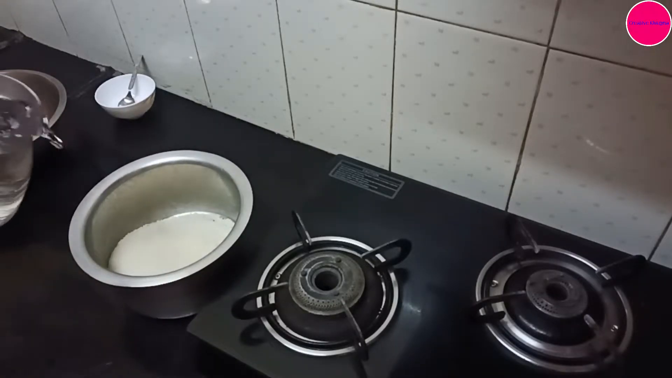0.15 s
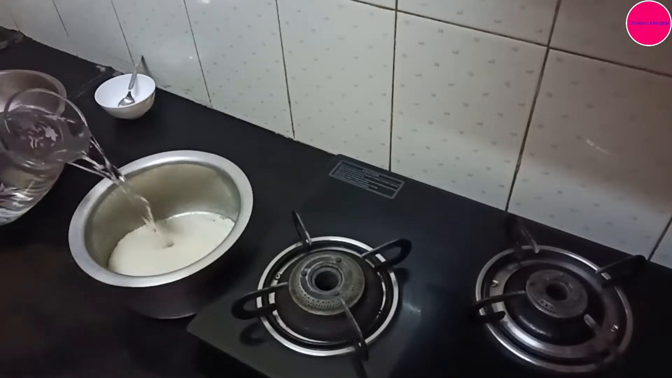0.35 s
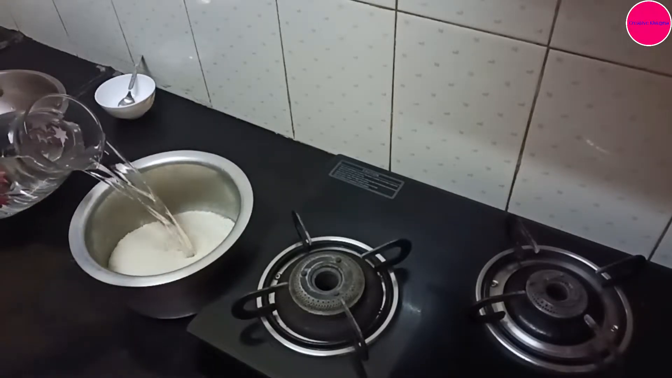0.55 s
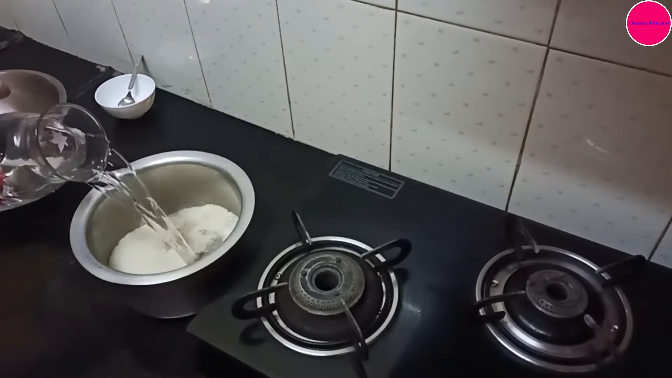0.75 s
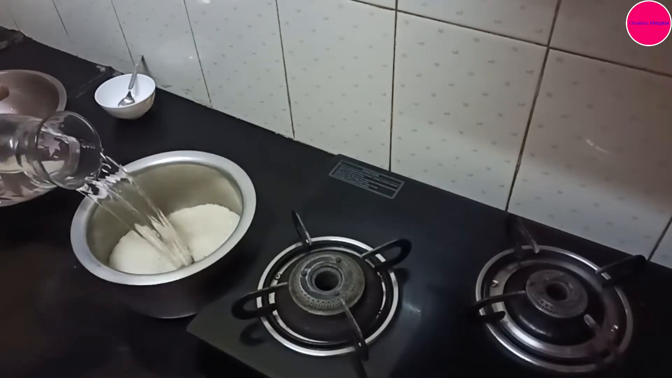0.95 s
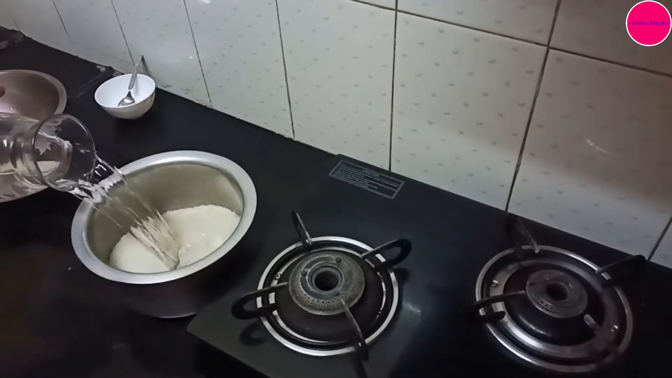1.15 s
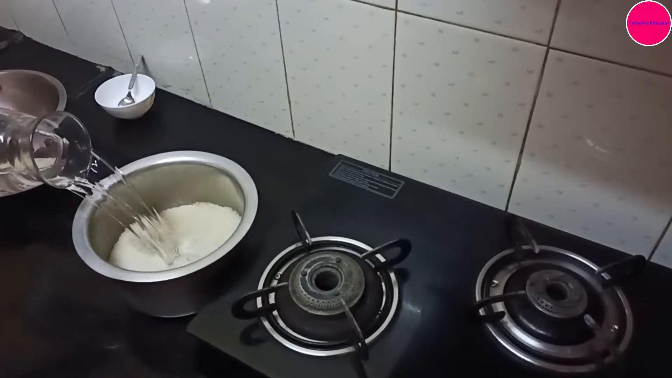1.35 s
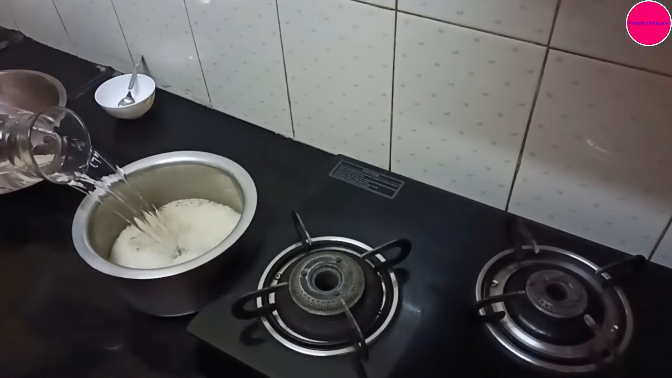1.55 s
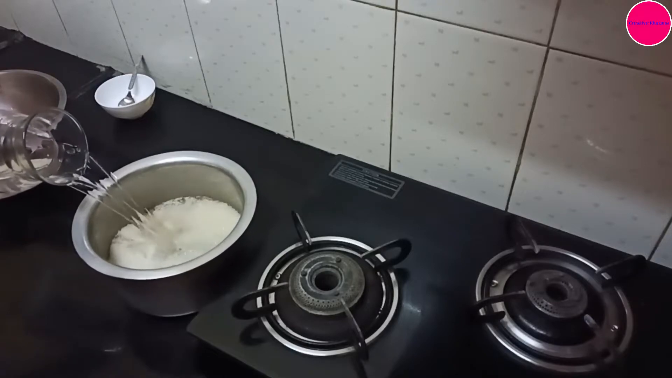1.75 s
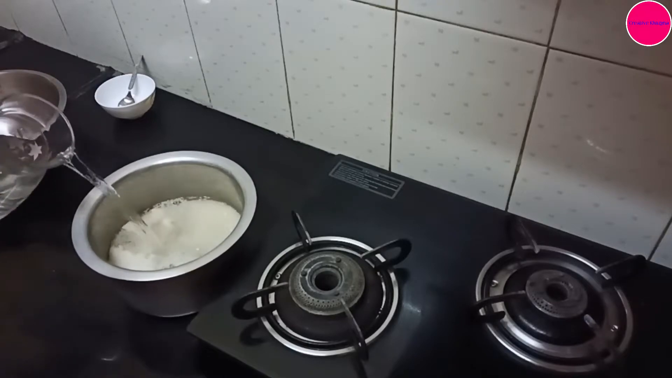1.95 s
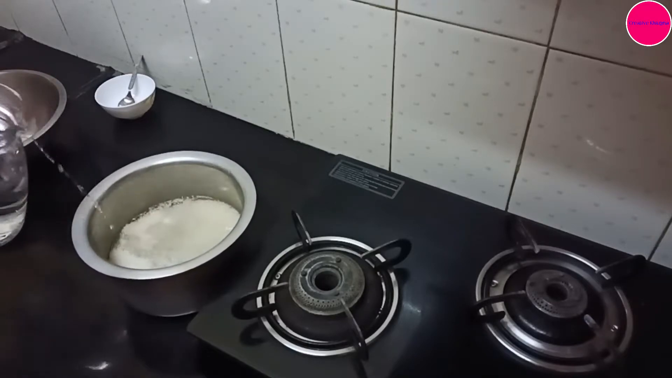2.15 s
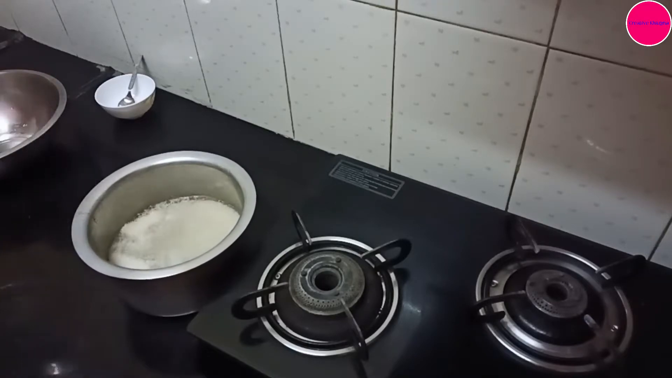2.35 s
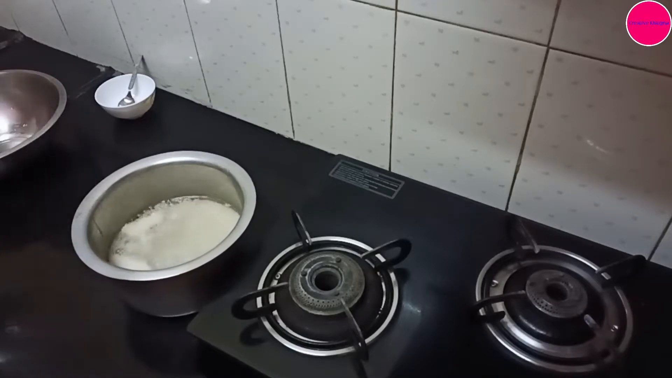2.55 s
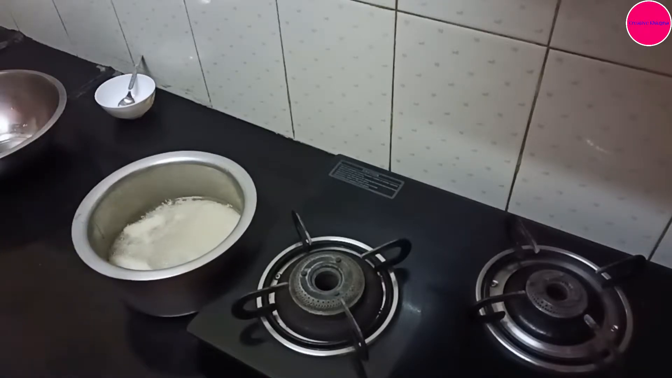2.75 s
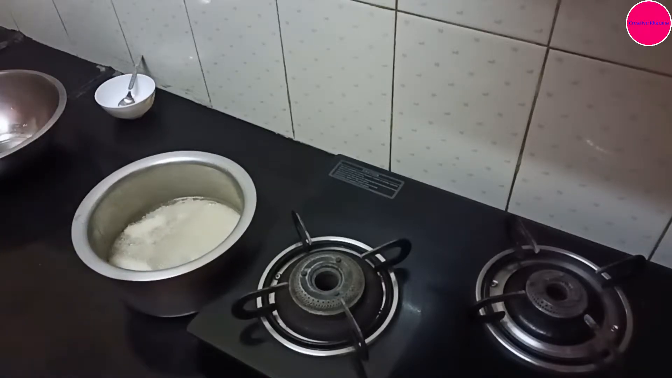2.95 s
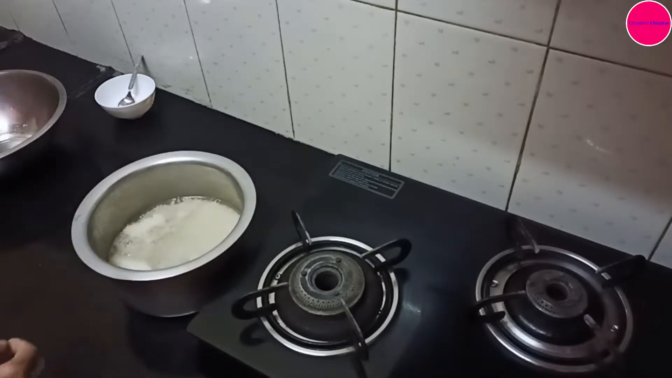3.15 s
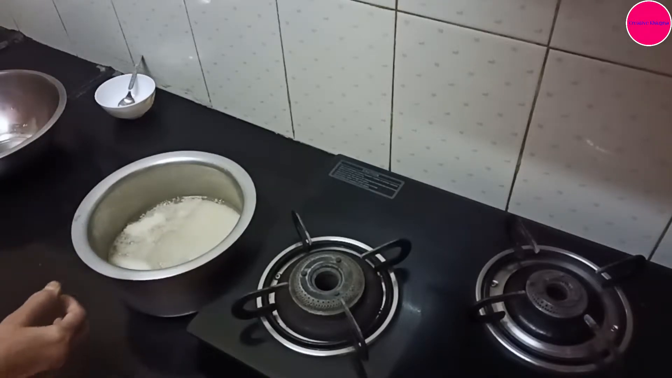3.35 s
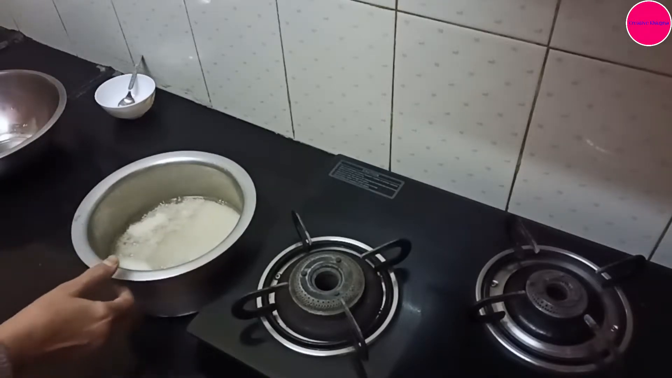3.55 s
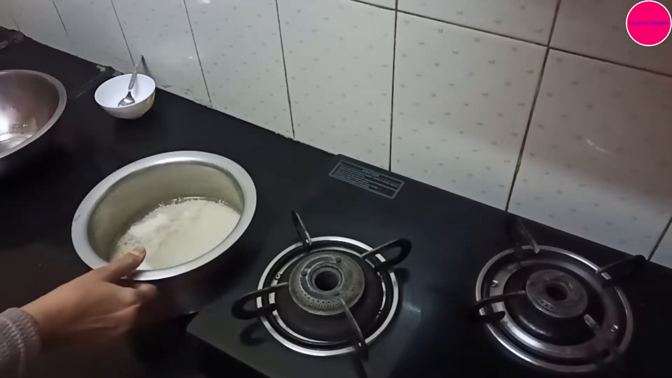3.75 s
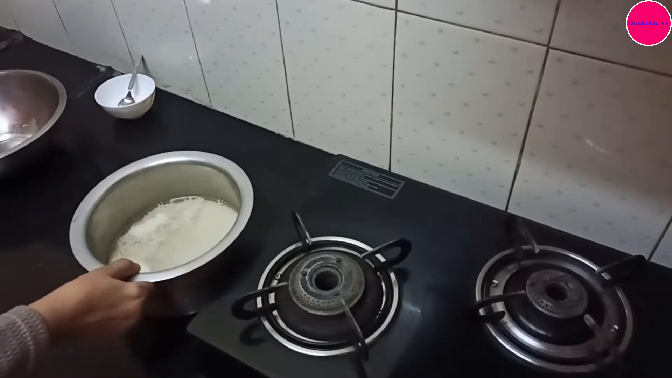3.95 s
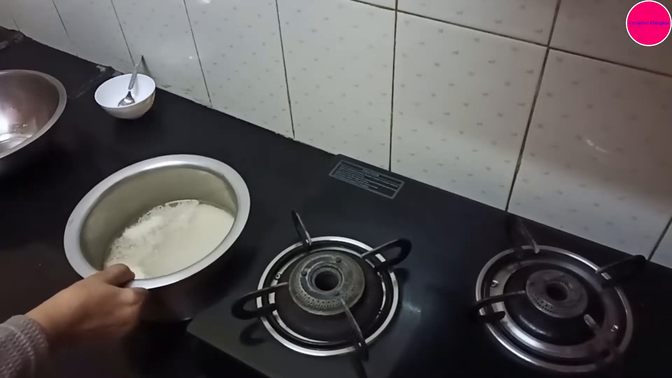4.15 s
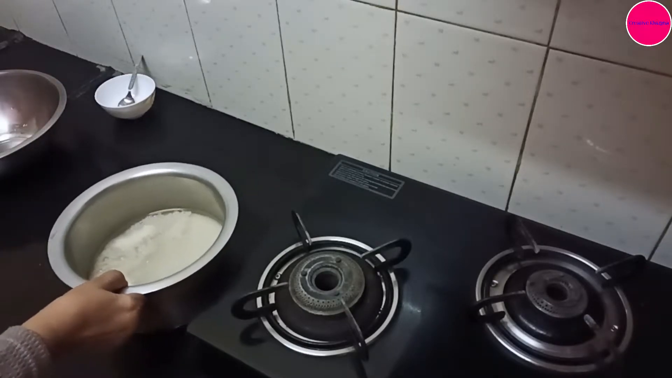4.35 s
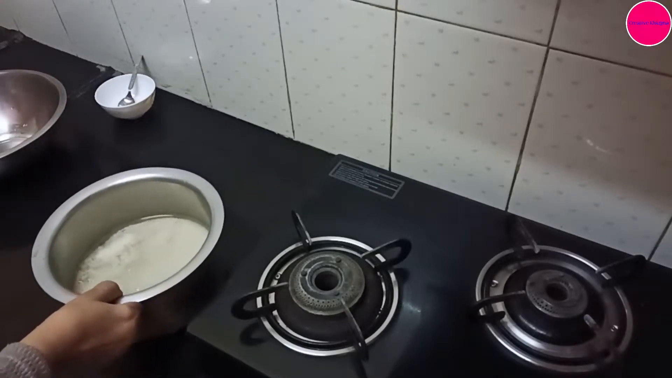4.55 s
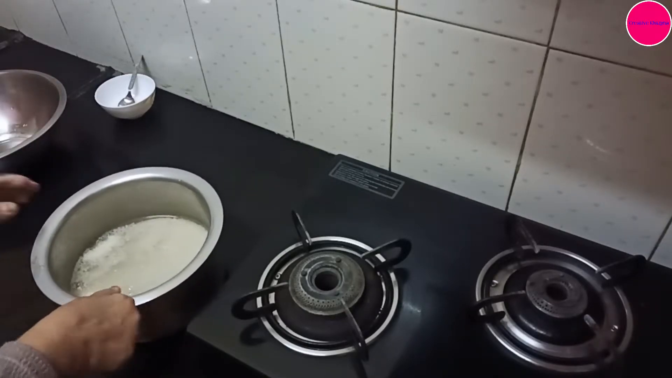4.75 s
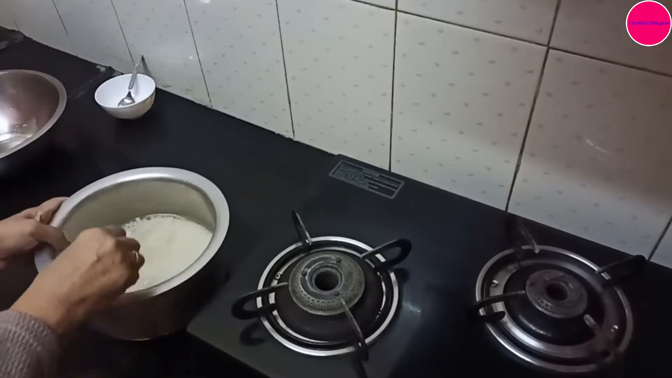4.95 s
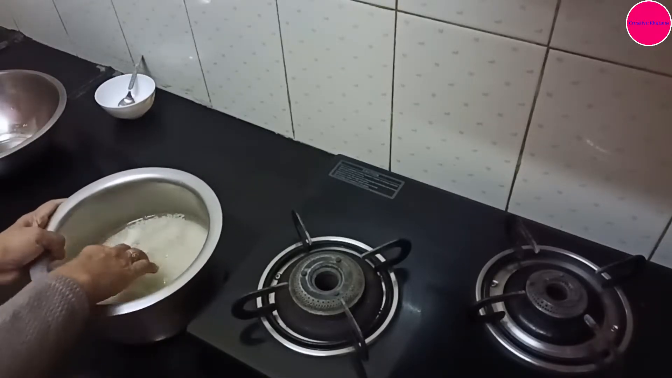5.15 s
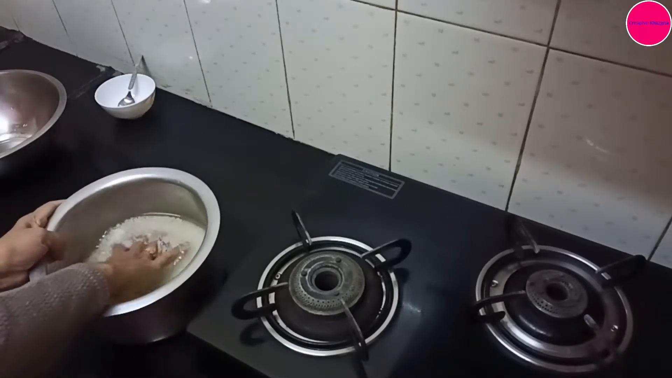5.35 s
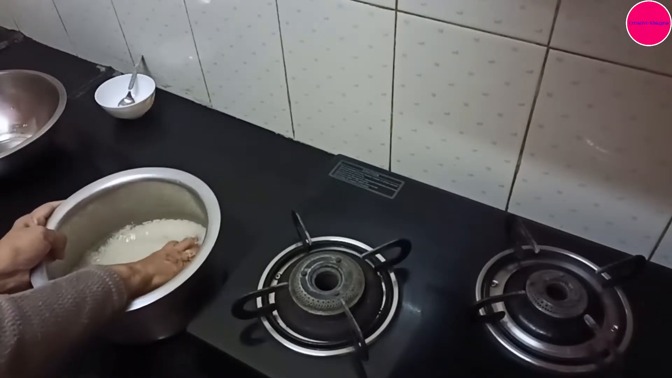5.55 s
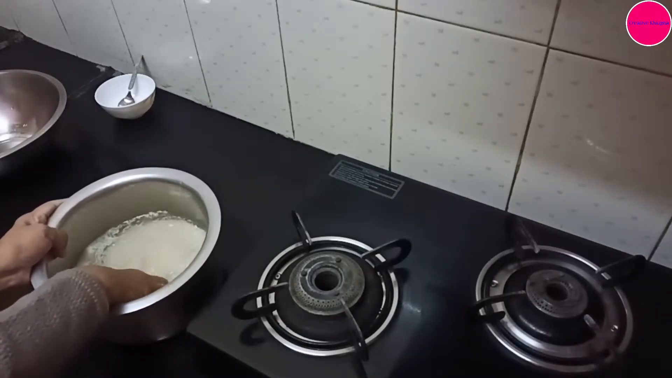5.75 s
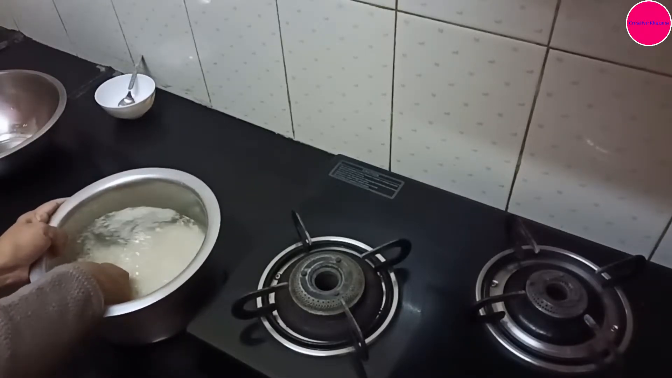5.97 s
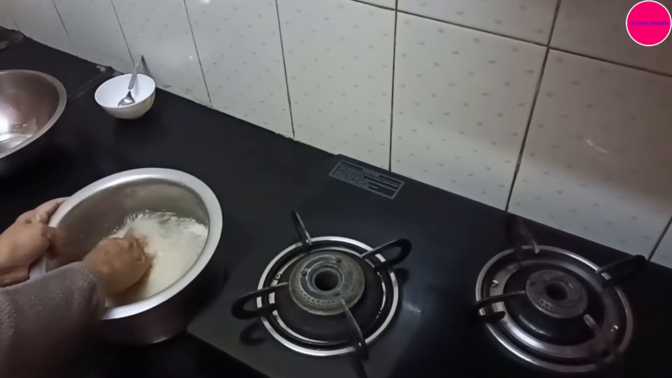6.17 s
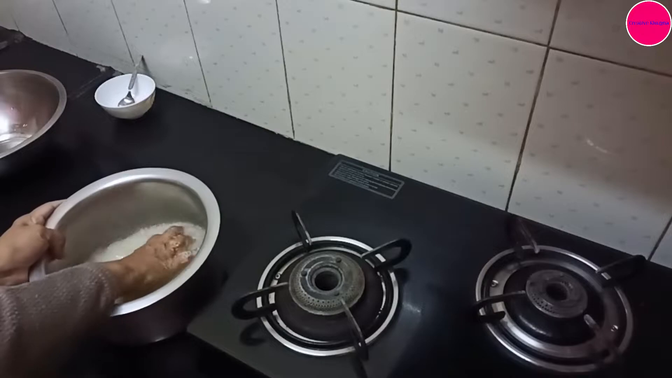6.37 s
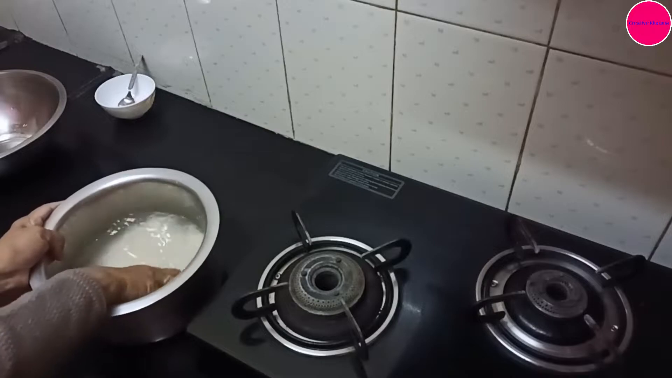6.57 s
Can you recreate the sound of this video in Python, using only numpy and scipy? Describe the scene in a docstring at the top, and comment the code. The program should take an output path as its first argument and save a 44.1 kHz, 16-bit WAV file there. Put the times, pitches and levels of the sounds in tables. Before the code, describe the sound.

In a small tiled kitchen, water pours onto rice in a steel pot, bright and fizzy, turning hollow midway with a gulp and a few bubble plinks. It stops with drips and near silence. The pot is then dragged, clanking brightly with a fluttering metallic squeal and gritty rub. Finally a hand swishes wet grains in strokes while the pot knocks dully. Close microphone, short room echo, faint low rumble.

```python
"""In a small tiled kitchen, water is poured from a jug onto rice in a steel pot on a stone counter.
Crackling noise makes the fizz, clouds of tiny rings the splash; a gulp and single bubbles ring out.
The pot is pulled, clanks (ringing modes) and sings as it slides (fluttering tones over rubbing noise).
Then a hand kneads the wet rice: grainy hiss and slosh in strokes, while the pot rocks and knocks.
Fading noise stands for the kitchen's echo, and a low rumble and faint hiss lie under everything."""
import sys
import numpy as np
from scipy import signal
from scipy.fft import rfft, irfft, next_fast_len
from scipy.io import wavfile
from scipy.ndimage import uniform_filter1d, map_coordinates

SR = 44100
rng = np.random.default_rng(int(sys.argv[2]) if len(sys.argv) > 2 else 0)


def file_out(sig):
    """Save sig as 16-bit WAV at sys.argv[1]."""
    # one column per channel
    cols = np.atleast_2d(sig).T
    # limit, then scale
    lim = np.clip(cols, -1, 1)
    pcm = np.round(lim * 32767).astype(np.int16)
    wavfile.write(sys.argv[1], SR, pcm)


N = 291501  # length in samples

# Levels are relative: sounds may be trimmed again where they are mixed.
# t60 is the time in which a sound falls by 60 dB.

# Low rumble and faint hiss: [f/Hz, level/dB]
RUMBLE = [(15, -53), (25, -43.5), (38, -30), (45, -36), (53, -2), (80, 2.5), (139, -2), (195, -8),
          (295, -12.5), (327, -9.5), (388, -9.5), (501, -16), (1290, -34.5), (1500, -25), (1950, -36.5),
          (3300, -120)]
AIR = [(300, 1.5), (500, -5.5), (850, -15), (1500, -14), (2500, -18.5), (6000, -28), (8000, -29.5),
       (11000, -35), (15700, -24.5)]
ROOM_DB, ROOM_RISE_S = -60.5, 0.7  # the kitchen's rumble fades in
DRUM_DB, DRUM_RISE_S, DRUM_FADE_DB_PER_S = -54, 0.12, 23  # the jet drums on the pot and counter
# the counter rumbles under the moving pot
DRAG_S, DRAG_LENGTH_S, DRAG_RISE_S, DRAG_DB, DRAG_FADE_DB_PER_S = 3.42, 0.84, 0.6, -48, 52
# the weight of the kneading hand rumbles through the counter
KNEAD_RUMBLE_DB, KNEAD_RUMBLE_RISE_S, KNEAD_RUMBLE_FADE_DB_PER_S = -49, 0.092, 4.5

# The jet on the rice: [t/s, fizz level/dB, splash level/dB]
POUR = [(0.362, -64, -86), (0.43, -47.5, -63.5), (0.468, -37, -48.5), (0.77, -31.5, -44.5),
        (1.06, -34, -40.5), (1.41, -39, -48.5), (1.7, -41, -48.5), (2.28, -47, -51.5),
        (2.39, -76.5, -102.5)]
# Bursting foam: [f/Hz, level per Hz/dB]
FIZZ = [(1470, -26), (2500, -19.5), (2760, -12.5), (3120, -17), (3850, -9), (4990, -5.5), (6590, -7.5),
        (7170, -2.5), (7860, 0), (8290, -1), (10400, -12), (12500, -13), (14900, -7.5), (15700, -9)]
# Splashing water: [f/Hz, level per Hz/dB]
SPLASH = [(150, -19.5), (300, -30), (550, -4), (900, -1.5), (1600, 1), (2500, 0.5), (3500, 5.5),
          (5000, 4.5), (8000, -17)]
# How hollow the splash sounds: [t/s, share 0..1]
HOLLOWNESS = [(0.7, 0.4), (1.25, 1), (1.9, 0.94), (2.2, 0.081)]
# Tone of the hollow splash: [f/Hz, level/dB]
HOLLOW_TONE = [(450, 5.0), (800, -9.5), (1200, -11.0), (1900, -1)]
# How long the tiled room echoes: [f/Hz, t60/s]
KITCHEN = [(150, 0.3), (500, 0.49), (2000, 0.44), (8000, 0.36), (15000, 0.19)]

# Wet slaps and spatter: [t/s, level/dB, centre f/Hz, width/octaves, t60/s]
SPLATS = [(.422, -45, 5840, 0.66, 0.39), (1.568, -47, 1410, 0.5, 0.39), (2.059, -41, 14800, 0.26, 0.044),
          (2.177, -38.5, 9050, 0.73, 0.026), (2.232, -33, 4560, 0.12, 0.051),
          (2.277, -46, 12650, 0.6, 0.17), (6.018, -42.5, 2220, 0.23, 0.27),
          (6.293, -45.5, 2800, 0.9, 0.075)]
# Resonances of a light tick against the held pot: [f/Hz, width/octaves, level/dB]
TICK = [(1590, 0.16, -59), (2350, 0.06, -53), (4200, 0.42, -47)]
TICK_S, TICK_T60_S = 6.42, 0.3

# Single bubbles and drops: [t/s, level/dB, starting f/Hz]
BUBBLES = [(.585, -23.5, 4780), (1.112, -33, 570), (1.145, -35.5, 502), (1.195, -39, 516),
           (1.574, -43, 1630), (2.092, -45, 900), (2.217, -43.5, 816), (2.247, -37.5, 2470),
           (2.263, -33.5, 720), (2.274, -40, 425)]
BUBBLE_CYCLES, BUBBLE_RISE = 48, 0.11  # t60 in cycles of the starting pitch; share by which the pitch rises

# the jet plunges through the rice and traps a pocket of air
GULP_S, GULP_LENGTH_S, GULP_RISE_S, GULP_FADE_DB_PER_S = 1.02, 0.2, 0.14, 106
GULP_HZ, GULP_OCTAVES, GULP_DB, GULP_RUMBLE_DB = 545, 0.13, -47, -49

FOAM_DB, FOAM_LASTS_S, FOAM_FADE_DB_PER_S = -66, 0.32, 21  # the foam left when the jet stops
SOAK_DB, SOAK_FADE_DB_PER_S = -77, -0.2  # faint ticks of wet rice; below zero means slowly growing
# Grains of wet rice: [f/Hz, level per Hz/dB]
RICE = [(1470, -72), (2500, -24), (2810, -13), (3080, -7.5), (4450, -7.5), (5350, -5.5), (6150, -7.5),
        (8110, 2), (10400, -11.5), (12400, -12), (14900, -5.5), (15700, -15)]

# The pulled pot hits the counter: [t/s, thud level/dB, grip 0 free..1 pressed by the hand,
# crack level/dB, wall ring level/dB, contact place 0 foot..1 side]
CLANKS = [(3.519, -26, 0.12, -30.5, 0.5, 0.3), (3.628, -34, 0.67, -52, -16.5, 0.016),
          (3.674, -36, 0.084, -60, -31, 0.02), (3.996, -30, 0.22, -36, -11.5, 0.64),
          (4.022, -25, 0.34, -27, 1, 0.89)]
# The kneading hand rocks the pot onto the counter: [t/s, thud level/dB, crack level/dB]
THUMPS = [(5.145, -28, -38), (5.294, -33, -43), (5.399, -29, -37), (5.44, -34, -54), (5.497, -40, -53),
          (5.75, -43.5, -64), (6.018, -26.5, -39.5), (6.19, -47, -42), (6.485, -33, -41),
          (6.567, -34.5, -46)]
HELD_GRIP, HELD_PLACE, HELD_RING_DB = 0.82, 0.14, -4  # for the thumps; ring relative to the crack
# Modes of the loaded base on the counter: [f/Hz, width/Hz, free level/dB, pressed level/dB]
BASE = [(120, 10, -20, -5), (166, 20, 5, -10), (212, 12, -5, -20), (242, 16, -8, -8), (308, 24, -6, -2),
        (397, 28, -4, -1), (455, 26, 0, -12), (500, 30, -5, -8), (580, 30, -10, -9), (624, 26, -7, -4),
        (706, 20, -2, -14), (735, 24, -12, -9), (775, 30, -10, -14), (825, 20, -9, -12),
        (912, 40, -14, -13.5), (1085, 70, -15, -16), (1300, 200, -18, -25)]
# Overall tone of the base: [f/Hz, level/dB]
BASE_TONE = [(30, -34), (70, -36), (130, 4.0), (400, 6.5), (900, 3), (1500, -2.0), (3000, 13),
             (9000, 12.5), (11500, 2.5)]
# Modes of the steel wall: [f/Hz, level struck at foot/dB, level struck at side/dB, t60 struck at foot/s]
WALL = [(1618, -31.5, -44, 0.78), (1965, -50, -58, 0.3), (2530, -45, -52, 0.4), (3015, -56, -42, 0.51),
        (4031, -57, -37, 0.46), (4231, -60, -47, 0.35), (4339, -41, -55, 0.53), (5308, -41, -54, 0.43),
        (4490, -58, -41, 0.48), (4736, -46, -66, 0.43), (4977, -48, -46, 0.42), (5375, -58, -41, 0.41),
        (5745, -58, -40, 0.4), (6389, -73, -54, 0.38), (7063, -62, -53, 0.36), (7222, -69, -53, 0.36),
        (7514, -74, -53, 0.36), (7901, -52, -65, 0.35), (8040, -40, -62, 0.35), (8298, -46, -57, 0.34),
        (8402, -53, -49, 0.34), (8515, -31, -52, 0.36), (8570, -60, -43, 0.34), (8668, -57, -49, 0.34),
        (8858, -68, -53, 0.33), (9235, -72, -42, 0.33), (9390, -55, -61, 0.33), (9641, -54, -58, 0.32),
        (9742, -75, -54, 0.32), (9822, -72, -54, 0.32), (13353, -58, -70, 0.28), (13527, -59, -69, 0.28)]
# Overall tone of the wall: [f/Hz, level/dB]
WALL_TONE = [(1600, 7), (3000, -6.0), (4300, 3.5), (8500, -0.5), (13500, 6.5)]
BLUR_TURNS = 0.0078  # random drift of a wall mode's phase in each sample
# The crack of the edge: [f/Hz, level per Hz/dB]
CRACK = [(500, -5.5), (1100, 4.5), (1700, -0.5), (2700, -7), (4300, -11), (5400, -15.5), (7000, -13.5),
         (8500, -14.5), (11000, -22.5), (15500, -18)]
# How a full grip dulls the top of the crack: [f/Hz, level/dB]
HAND_MUFFLES = [(4000, 0), (8500, 2), (11500, -12)]

# The base catches and sets the wall singing: [t/s, length/s, level/dB]
SQUEALS = [(3.63, 0.097, -56), (3.73, 0.31, -51), (4.07, 0.05, -52), (4.186, 0.071, -49.5),
           (4.322, 0.068, -52)]
# Tones of the squeal: [f/Hz, level/dB]
SQUEAL = [(2686, -11.5), (3017, 4), (3354, -14)]
SQUEAL_RISE_S, SQUEAL_FADE_DB_PER_S = 0.017, 280
AFTERRING_DB, AFTERRING_DB_PER_S = -13, 41.5  # a weak part of each squeal fades more slowly
CATCH_RATE, CATCH_FIRMNESS = 26, 2.3  # stick-slip changes a second; how firmly the tone holds between dropouts
# Tugs that drag the pot over the stone: [t/s, length/s, rubbing level/dB]
TUGS = [(3.633, 0.096, -45), (3.762, 0.25, -50), (4.12, 0.1, -44), (4.275, 0.09, -53), (4.703, 0.11, -61)]
TUG_RISE_S, TUG_FADE_DB_PER_S = 0.031, 126
# Grit under the base: [f/Hz, level per Hz/dB]
SCRAPE = [(900, -22.5), (1600, 3.5), (2600, -2), (4400, 0.5), (6000, -8.5), (7800, -4), (11000, -19),
          (14700, -15), (15700, -21.5)]

# Strokes of the hand through the rice: [t/s, length/s, grain hiss level/dB, slosh level/dB]
STROKES = [(5.257, 0.15, -60.5, -62), (5.397, 0.0081, -46.5, -54), (5.454, 0.1, -65, -63),
           (5.764, 0.18, -50, -58.5), (5.99, 0.11, -50, -57), (6.136, 0.075, -44.5, -54),
           (6.246, 0.032, -58.5, -61), (6.427, 0.17, -59, -61)]
STROKE_RISE_SHARE, STROKE_FADE_DB_PER_S = 0.21, 71  # a stroke builds up over this share of its length
# the hand keeps moving between strokes
KNEAD_S, KNEAD_RISE_S, KNEAD_HISS_DB, KNEAD_SLOSH_DB = 5.15, 0.34, -59, -66
# Water moved by the hand: [f/Hz, level per Hz/dB]
SLOSH = [(300, -19), (800, -7), (1600, -11), (2500, -2), (3500, -9), (5000, 6.5), (8000, -16)]

# Bass response of the microphone: [f/Hz, level/dB]
MICROPHONE = [(25, -9), (50, -13.5), (64, -0.5)]
TOP_HZ = 15750  # nothing is kept from here up


def amp(db):
    """Turn decibels into a gain."""
    return 10 ** (np.asarray(db) / 20)


def unit(x):
    """Scale a sound to an average strength (rms) of 1."""
    return x / np.sqrt(np.mean(x ** 2) + 1e-20)


def along(points, hz):
    """Read a value between (Hz, value) points, on a log frequency axis."""
    f, v = np.transpose(points)
    return np.interp(np.log(hz + 1), np.log(f + 1), v)


def curves(rows):
    """Give one value per sample for each column after the time."""
    s, *columns = np.transpose(rows)
    return [np.interp(np.arange(N) / SR, s, column) for column in columns]


def during(rows):
    """Give 1 while a table lasts and 0 outside, with edges softened over 10 ms."""
    t = np.arange(N) / SR
    inside = (t >= rows[0][0]) & (t <= rows[-1][0])
    return uniform_filter1d(1.0 * inside, size=441)


def swell(s, length_s, rise_s, fade_db_per_s):
    """A gain that rises from time s, holds until its length is over, then fades."""
    t = np.arange(N) / SR - s
    return np.clip(t / rise_s, 0, 1) * amp(-fade_db_per_s * np.maximum(t - length_s, 0))


def together(gains):
    """The gain of several unrelated sounds at once: their powers add."""
    return np.sqrt(sum(g ** 2 for g in gains))


def wobble(rate):
    """A smooth random curve through `rate` random points a second."""
    points = rng.standard_normal(int(N * rate / SR) + 4)
    return map_coordinates(points, [np.arange(N) * rate / SR])


def filtered(x, response):
    """Multiply a sound's spectrum by a response that depends on frequency."""
    m = next_fast_len(len(x) + 8192)
    return irfft(rfft(x, m) * response(np.fft.rfftfreq(m, 1 / SR)), m)[:len(x)]


def coloured(x, spectrum):
    """Shape a sound by the given spectrum, at rms 1."""
    return unit(filtered(x, lambda hz: amp(along(spectrum, hz))))


def band(length, centre_hz, octaves):
    """Noise of rms 1 in one bell-shaped band."""
    def bell(hz):
        return np.exp(-.5 * (np.log2((hz + 1) / centre_hz) / octaves) ** 2)
    return unit(filtered(rng.standard_normal(length), bell))


def add(track, s, sound):
    """Mix a sound into the track at time s."""
    part = track[round(s * SR):][:len(sound)]
    part += sound[:len(part)]


def background():
    """A faint even hiss, and a rumble that grows while the jet, the dragged pot or the hand shakes the counter."""
    start, end = POUR[0][0], POUR[-1][0]
    shaking = together([
        amp(ROOM_DB) * swell(0, 0, ROOM_RISE_S, 0),
        amp(DRUM_DB) * swell(start, end - start, DRUM_RISE_S, DRUM_FADE_DB_PER_S),
        amp(DRAG_DB) * swell(DRAG_S, DRAG_LENGTH_S, DRAG_RISE_S, DRAG_FADE_DB_PER_S),
        amp(KNEAD_RUMBLE_DB) * swell(KNEAD_S, 0, KNEAD_RUMBLE_RISE_S, KNEAD_RUMBLE_FADE_DB_PER_S)])
    rumble = shaking * coloured(rng.standard_normal(N), RUMBLE)
    hiss = amp(-69.0) * coloured(rng.standard_normal(N), AIR)
    return rumble + hiss


def crackle(spectrum, spread_db, count):
    """Tiny bursts of uneven size at random times; a larger spread makes the sizes more uneven."""
    at = rng.integers(0, N, count)
    sizes = amp(spread_db * np.minimum(rng.exponential(size=count), 5)) * rng.choice([-1, 1], count)
    return coloured(np.bincount(at, sizes, N), spectrum)


def bubbling(pitch_hz, cycles, spread_db, count):
    """A cloud of small bubbles, each a short ring that rises in pitch."""
    at = rng.integers(0, N, (count, 1))
    hz = np.clip(pitch_hz * np.exp(0.681 * rng.standard_normal((count, 1))), 400, 7000)
    sizes = amp(spread_db * np.minimum(rng.exponential(size=(count, 1)), 4))
    k = np.arange(400)  # samples in one ring
    turns = hz * k / SR
    rising = turns * (1 + 0.039 * np.minimum(turns / cycles, 2))
    rings = sizes * np.sin(2 * np.pi * rising) * amp(-60 * turns / cycles)
    return unit(np.bincount((at + k).ravel(), rings.ravel(), N)[:N])


def pour():
    """The jet whips up fizzing foam over a splash of larger bubbles, more hollow in the middle of the pour."""
    fizz_db, splash_db = curves(POUR)
    fizz = amp(fizz_db + 0.79 * wobble(35.2)) * crackle(FIZZ, spread_db=-1.5, count=40000)
    froth = bubbling(pitch_hz=2200, cycles=30, spread_db=2.5, count=6000)
    cloud = coloured(froth + 0.87 * rng.standard_normal(N), SPLASH)
    hollowness, = curves(HOLLOWNESS)
    hollow = filtered(cloud, lambda hz: amp(along(HOLLOW_TONE, hz)))
    blend = cloud + hollowness * (hollow - cloud)
    splash = amp(splash_db - 1.9 + 0.88 * wobble(25.7)) * blend
    return (fizz + splash) * during(POUR)


def kitchen(x):
    """The tiled room's echo: a tail of noise in which each frequency dies at its own speed."""
    hz, t, z = signal.stft(rng.standard_normal(SR * 3 // 4), SR, nperseg=256)
    fade = amp(-60 * t / along(KITCHEN, hz)[:, None])
    tail = signal.istft(z * fade, SR, nperseg=256)[1]
    tail *= 1 - np.exp(-np.arange(len(tail)) / SR / 0.0038)  # echoes take a few ms to build up
    return signal.fftconvolve(x, tail / np.linalg.norm(tail))[:len(x)]


def shifting_kitchen(x):
    """The echo of a source that keeps moving: a new set of reflections every eighth of a second."""
    out, hop = np.zeros(N), SR // 8
    window = np.hanning(2 * hop)  # overlapping pieces blend into each other
    for i in range(0, N, hop):
        part = x[i:i + 2 * hop]
        add(out, i / SR, kitchen(np.pad(part * window[:len(part)], (0, SR // 2))))
    return out


def splats():
    """Small slaps of water and a tick on the pot: fading puffs of noise, each in its own band."""
    out, t = np.zeros(N), np.arange(SR // 2) / SR
    tick = [(TICK_S, db, hz, octaves, TICK_T60_S) for hz, octaves, db in TICK]
    for s, db, centre_hz, octaves, t60 in SPLATS + tick:
        puff = amp(db + 2 - 60 * t / t60) * band(len(t), centre_hz, octaves)
        add(out, s, puff + amp(-10.0) * kitchen(puff))
    return out


def bubbles():
    """Trapped air rings and rises in pitch as it nears the surface; large bubbles ring longest."""
    out, t = np.zeros(N), np.arange(SR // 2) / SR
    for s, db, hz in BUBBLES:
        t60 = BUBBLE_CYCLES / hz
        pitch = hz * (1 + BUBBLE_RISE * np.minimum(t / t60, 1))
        tone = np.sin(2 * np.pi * np.cumsum(pitch) / SR)
        ring = amp(db - 60 * t / t60) * tone * (1 - np.exp(-t * hz / 2))
        add(out, s, amp(4.0) * ring + amp(-5.5) * kitchen(ring))
    return out


def gulp():
    """The air pocket hums hollowly and shakes the pot."""
    hollow = amp(GULP_DB) * band(N, GULP_HZ, GULP_OCTAVES)
    rumble = amp(GULP_RUMBLE_DB) * coloured(rng.standard_normal(N), RUMBLE)
    return swell(GULP_S, GULP_LENGTH_S, GULP_RISE_S, GULP_FADE_DB_PER_S) * (hollow + rumble)


def foam():
    """As the jet dies away the foam fizzes out, and the soaked rice quietly ticks on."""
    s = POUR[-2][0]
    froth_gain = amp(FOAM_DB) * swell(s, FOAM_LASTS_S, 0.05, FOAM_FADE_DB_PER_S)
    soak_gain = amp(SOAK_DB) * swell(s, 0, 0.24, SOAK_FADE_DB_PER_S)
    froth = froth_gain * crackle(FIZZ, spread_db=3, count=60000)
    soak = soak_gain * crackle(RICE, spread_db=1.5, count=60000)
    return froth + soak


def base(hz, grip):
    """Response of the pot's base; a pressing hand damps some modes and favours others."""
    modes = 0
    for k, (centre, width, free_db, held_db) in enumerate(BASE):
        level = (-1) ** k * amp(free_db + grip * (held_db - free_db))  # neighbours have opposite signs
        modes = modes + level * 1j * hz * width / (centre * centre - hz * hz + 1j * hz * width)
    return modes * amp(along(BASE_TONE, hz))


def thud(grip):
    """The base chatters on the stone for an instant, then its modes ring on."""
    t = np.arange(SR) / SR
    chatter = rng.standard_normal(SR) * amp(-60 * t / 0.13)
    knock = filtered(chatter, lambda hz: base(hz, grip))
    knock = knock + amp(-3.0) * kitchen(knock)
    knock /= np.std(knock[:SR // 20])  # level over the first 50 ms
    for hz, _, free_db, held_db in BASE:
        level, phase = rng.standard_normal(2)
        db = free_db + grip * (held_db - free_db)
        fade = amp(db - 7.5 + level - 60 * t / .5)
        knock += fade * np.sin(2 * np.pi * (hz * t + phase)) * (1 - np.exp(-t / 0.0013))
    return knock


def clang(place):
    """The steel wall rings hard while it bounces free, then settles and fades."""
    t, ring = np.arange(SR) / SR, np.zeros(SR)
    for hz, foot_db, side_db, t60 in WALL:
        phase, split = rng.standard_normal(2)
        # the moving load blurs each mode, and the slightly oval wall splits it into a beating pair
        turns = hz * t + phase + np.cumsum(rng.standard_normal(SR)) * BLUR_TURNS
        partner = turns + (14 + 4 * split) * t
        pair = np.sin(2 * np.pi * turns) + .6 * np.sin(2 * np.pi * partner)
        db = foot_db + place * (side_db - foot_db) + along(WALL_TONE, hz)
        # dB a second; side contact holds the low modes back
        damping = 60 / t60 + place * 70 * (1600 / hz) ** 2
        ring += amp(db - t * damping) * pair
    return ring * (1 + .6 * np.exp(-t / .035)) * (1 - np.exp(-t / .005))


def knocks():
    """At each contact the base thuds, the edge cracks and the wall rings; a gripping hand changes thud and crack."""
    out, t = np.zeros(N), np.arange(SR) / SR
    held = [(s, thud_db, HELD_GRIP, crack_db, crack_db + HELD_RING_DB, HELD_PLACE)
            for s, thud_db, crack_db in THUMPS]
    for s, thud_db, grip, crack_db, ring_db, place in CLANKS + held:
        rise = 1 - np.exp(-t / (0.00043 + 0.0064 * place))  # a glancing blow on the side builds up more slowly
        fade = amp(-60 * t / 0.11)
        crack = amp(crack_db) * rise * fade * coloured(rng.standard_normal(SR), CRACK)
        crack = filtered(crack, lambda hz: amp(grip * along(HAND_MUFFLES, hz)))
        ring = amp(ring_db - 1) * clang(place)
        echo = kitchen(crack + .5 * ring)
        add(out, s, amp(thud_db - 0.5) * thud(grip) + crack + ring + echo)
    return out


def slide():
    """Gritty stone rubs the base at each tug, and stick-slip keeps the wall singing in quick flutters."""
    rubbing = together(amp(db) * swell(s, length, TUG_RISE_S, TUG_FADE_DB_PER_S) for s, length, db in TUGS)
    parts = [(0, SQUEAL_FADE_DB_PER_S), (AFTERRING_DB, AFTERRING_DB_PER_S)]
    singing = together(amp(db + part_db) * swell(s, length, SQUEAL_RISE_S, fade)
                       for s, length, db in SQUEALS for part_db, fade in parts)
    clock = (np.arange(N) + np.cumsum(.002 * wobble(45))) / SR  # slightly uneven, so the pitch wavers
    tones = np.zeros(N)
    for hz, db in SQUEAL:
        catching = np.tanh(CATCH_FIRMNESS * np.abs(wobble(CATCH_RATE)))
        tones += amp(db) * catching * np.sin(2 * np.pi * hz * clock)
    squeal = unit(tones)
    grit = amp(-12.5) * coloured(rng.standard_normal(N), SCRAPE)
    rub = unit(filtered(rng.standard_normal(N), lambda hz: base(hz, grip=0.17))) + grit
    return singing * squeal + rubbing * rub


def stir():
    """With each stroke wet grains scrape over the steel in clumps while water squelches between the fingers."""
    kneading = swell(KNEAD_S, 0, KNEAD_RISE_S, 0)
    moves = [(kneading, KNEAD_HISS_DB, KNEAD_SLOSH_DB)]
    for s, length, hiss_db, slosh_db in STROKES:
        stroke = swell(s, length, STROKE_RISE_SHARE * length, STROKE_FADE_DB_PER_S)
        moves.append((stroke, hiss_db, slosh_db))
    grains = crackle(RICE, spread_db=4, count=14000)
    clumps_db = 1.2 * wobble(70)
    hiss = together(move * amp(db) for move, db, _ in moves) * amp(clumps_db) * grains
    cloud = bubbling(pitch_hz=2500, cycles=14, spread_db=3.5, count=5000) + .7 * rng.standard_normal(N)
    squelch_db = 1.6 * wobble(30)
    slosh = together(move * amp(db) for move, _, db in moves) * amp(squelch_db) * coloured(cloud, SLOSH)
    return hiss + slosh


def scene():
    """Everything happens at the pot, straight ahead, so both channels are alike."""
    water = pour() + stir()
    mid = background() + amp(0.83) * water + amp(-2) * shifting_kitchen(water)
    mid += splats() + bubbles() + gulp() + foam()
    mid += knocks() + slide()
    return np.array([mid, mid])


def record(dry):
    """The microphone weakens deep bass and keeps nothing above its band limit."""
    def response(hz):
        return amp(along(MICROPHONE, hz)) * (hz < TOP_HZ)
    return np.array([filtered(channel, response) for channel in dry])


dry = scene()
out = record(dry)
file_out(out)
```